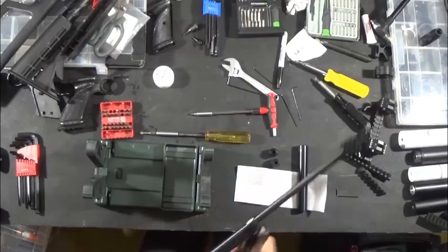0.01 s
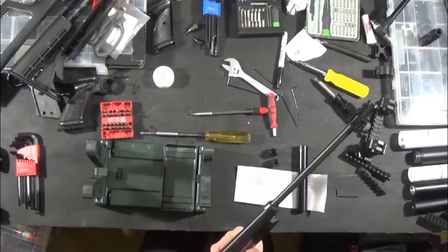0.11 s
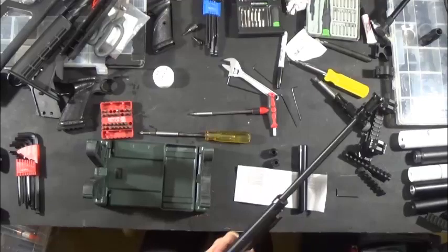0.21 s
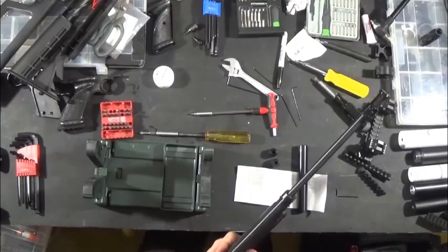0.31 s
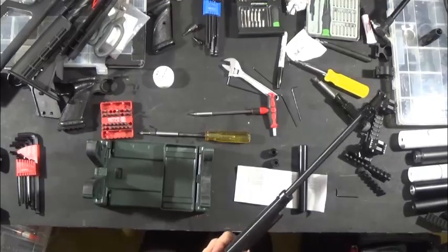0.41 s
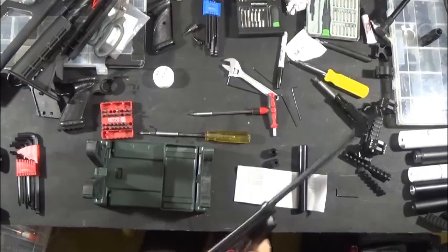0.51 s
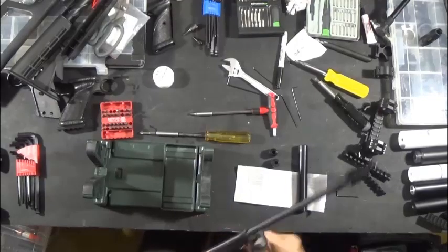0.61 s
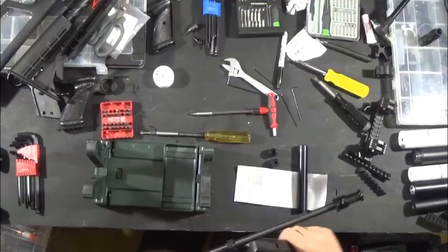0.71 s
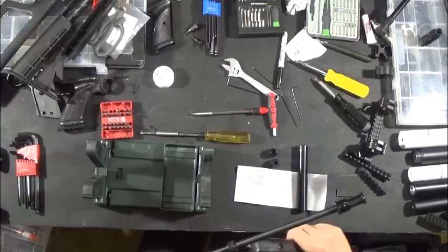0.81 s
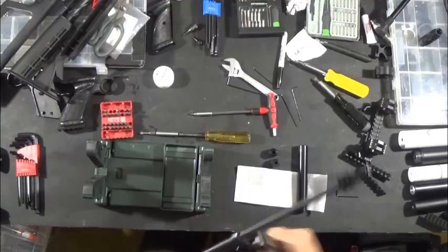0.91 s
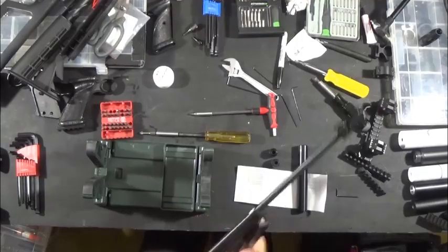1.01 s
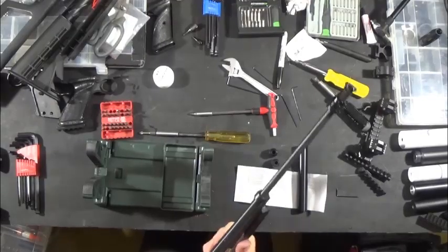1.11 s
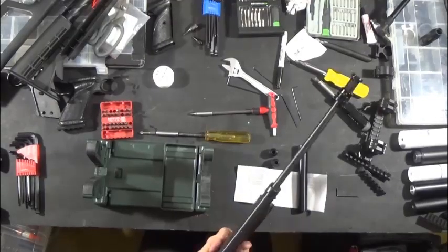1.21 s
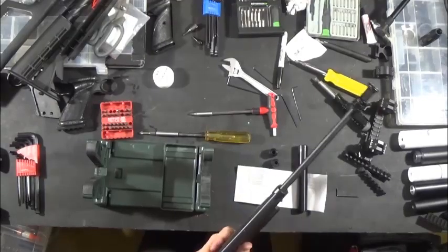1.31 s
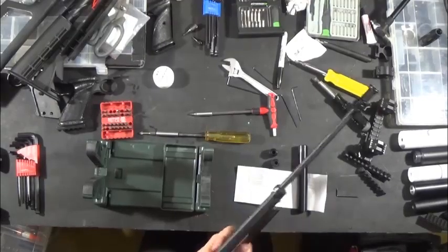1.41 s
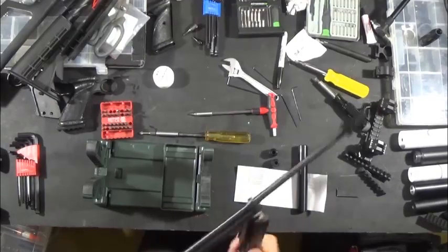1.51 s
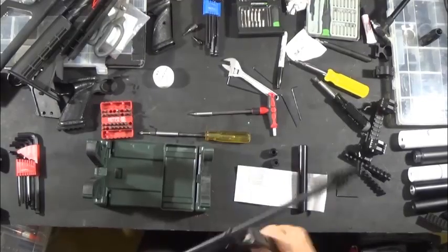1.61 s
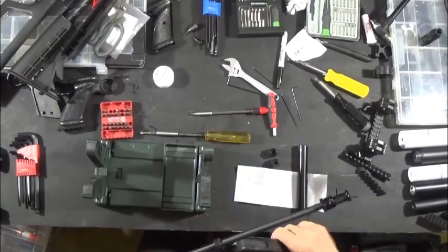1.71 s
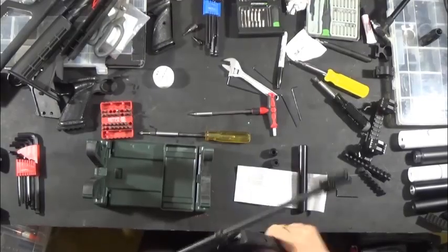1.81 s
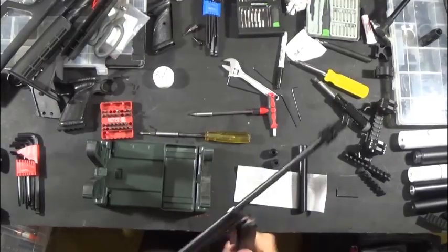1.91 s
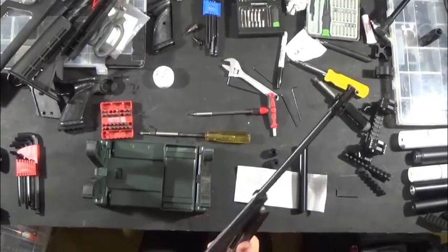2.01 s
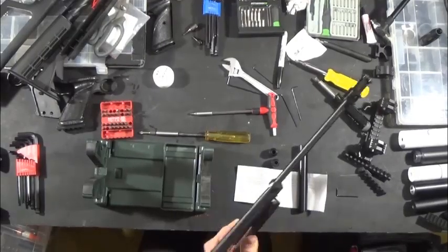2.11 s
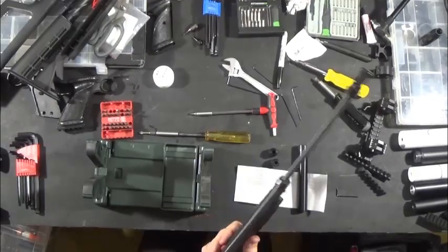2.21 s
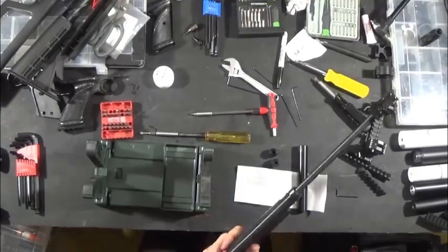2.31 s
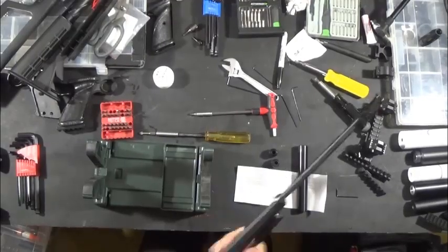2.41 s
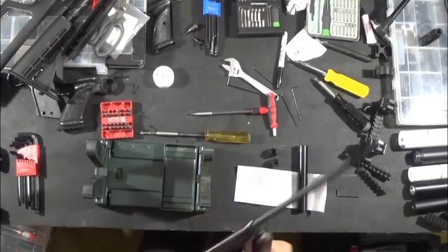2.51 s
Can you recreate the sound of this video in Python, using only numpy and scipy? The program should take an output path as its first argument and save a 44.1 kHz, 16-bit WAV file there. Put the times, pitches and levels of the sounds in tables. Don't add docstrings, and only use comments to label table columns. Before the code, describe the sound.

An air pistol's pump lever is worked three times, each stroke knocking, slamming shut with a sharp clack and puff of air, then clicking open again; close microphones in a small workshop with low room rumble.

```python
import sys
import numpy as np
from scipy import signal
from scipy.fft import rfft, irfft, next_fast_len
from scipy.io import wavfile
from scipy.ndimage import map_coordinates

SR = 44100
rng = np.random.default_rng(int(sys.argv[2]) if len(sys.argv) > 2 else 0)


def gain_from_db(level_db):
    decades = np.asarray(level_db, float) / 20
    return 10 ** decades


def inscribe(sig):
    pcm = np.round(np.clip(np.atleast_2d(sig).T, -1, 1) * 32767)
    wavfile.write(sys.argv[1], SR, pcm.astype(np.int16))


N = 114660


def unit(x):
    return x / np.sqrt(np.mean(np.abs(x) ** 2) + 1e-20)


def wobble(knots_per_s):
    knots = rng.standard_normal(int(N * 2000 / SR) + 4)
    return map_coordinates(knots, [np.arange(N) * knots_per_s / SR])


def filtered(x, response):
    m = next_fast_len(N + SR // 2)
    return irfft(rfft(x, m) * response(np.fft.rfftfreq(m, 1 / SR)), m)[..., :N]


def along(points, hz):
    f, v = np.transpose(points)
    return np.interp(np.log(hz + 1), np.log(f + 1), v)


def rush(spectrum, side_db):
    mid, side = filtered(rng.standard_normal((2, N)), lambda hz: gain_from_db(along(spectrum, hz)))
    side = gain_from_db(side_db) * side
    return unit(np.array([mid + side, mid - side]))


def shape(start_s, attack_s, hold_s, t60_s):
    t = np.arange(N) / SR - start_s
    release_s = np.clip(t - attack_s - abs(hold_s), 0, 9)
    return np.clip(t / attack_s, 0, 1) * gain_from_db(-60 * release_s / t60_s)


# frequency in Hz, level in dB per Hz.
ROOM_NOISE = [(22, -20), (40, -10.5), (70, -7), (125, -7), (170, -15.5), (320, -16.5), (1100, -25),
              (2500, -26)]


def room_rumble():
    rumble_db, murmur_db = -53.5, -62
    low = gain_from_db(rumble_db + 1.22 * wobble(7.05)) * rush(ROOM_NOISE[:5] + [(300, -36)], side_db=-26.0)
    murmur = rush([(100, -55)] + ROOM_NOISE[4:] + [(5000, -36)], side_db=-5.0)
    return low + gain_from_db(murmur_db + 2.7 * wobble(8.14)) * murmur


# time in seconds, hiss level in dB.
PISTON_FLOW = [(0, -58), (.13, -56), (.2, -54), (.46, -58), (.55, -46.5), (.67, -54.5), (.84, -69),
               (.95, -53.5), (1.12, -64), (1.39, -55.5), (1.6, -53), (1.68, -58), (1.82, -61.5),
               (1.95, -54.5), (2.08, -67.5), (2.39, -57.5), (2.6, -53)]
# frequency in Hz, level in dB per Hz.
HISS_SPECTRUM = [(1200, -4), (2200, -7), (3100, -3), (4500, -2), (6500, -2), (8600, 2.5), (11000, -5.5),
                 (16000, -11.5)]


def piston_hiss():
    s, db = np.transpose(PISTON_FLOW)
    level_db = np.interp(np.arange(N) / SR, s, db)
    flutter_db = 1.4 * wobble(22) + .75 * wobble(180)
    return gain_from_db(level_db + flutter_db) * rush(HISS_SPECTRUM, side_db=-13)


def squeal(tables, rough):
    overtone_db, fade_s = -28, .002
    out, t = np.zeros(N), np.arange(N) / SR
    for rows in tables:
        s, hz, db = np.transpose(rows)
        phase = 2 * np.pi * np.cumsum(np.interp(t, s, hz)) / SR
        fade = np.clip(np.minimum(t - s[0], s[-1] - t) / fade_s, 0, 1)
        level = np.sqrt(2) * fade * gain_from_db(np.interp(t, s, db))
        tone = np.sin(phase) + gain_from_db(overtone_db) * np.sin(2 * phase)
        out += level * unit(1 + rough * wobble(400)) * tone
    return out


# time in seconds, pitch in Hz, level in dB.
PIVOT_CREAKS = [
    [(.045, 3100, -70), (.115, 3200, -60), (.16, 3150, -61), (.2, 3150, -67)],
    [(.35, 1300, -66), (.41, 1290, -61), (.47, 1280, -66)],
    [(1.86, 2430, -75), (1.89, 2440, -55), (1.905, 2400, -75)],
    [(0.64, 2800, -69), (0.654, 2820, -54), (0.666, 3060, -66), (0.676, 2740, -51), (0.71, 2980, -72)],
    [(1.622, 2840, -63), (1.63, 2630, -50), (1.642, 2990, -55), (1.66, 2750, -56), (1.68, 3000, -67)],
]


def pivot_creaks():
    return squeal(PIVOT_CREAKS, rough=1.4)


# time in seconds, pitch in Hz, level in dB.
SEAL_SQUEAKS = [
    [(.203, 5750, -50), (.2105, 5450, -15.5), (.2128, 5300, -30), (.215, 5270, -24), (.223, 5320, -23),
     (.231, 5230, -27), (.2345, 5160, -12), (.238, 5100, -19), (.2425, 4900, -21)],
    [(2.122, 6040, -46), (2.135, 5950, -36), (2.14, 5650, -28), (2.1465, 5570, -20), (2.149, 5560, -29),
     (2.155, 5540, -34)],
]


def seal_squeaks():
    return squeal(SEAL_SQUEAKS, rough=.12)


# start in seconds, length in seconds.
SLIDES = [
    (.221, .021),
    (.472, .023),
    (1.138, .065),
    (1.43, .022),
    (1.685, .032),
    (2.104, .05),
    (2.408, .03),
    (1.622, .04),
    (.09, .05),
]
SLIDES_DB = [-39.5, -44, -53, -45, -74, -42.5, -45.5, -61, -57.5]


def scrapes():
    grain_db, t60_s = 3.5, .04
    level = np.zeros(N)
    for (s, length_s), db in zip(SLIDES, SLIDES_DB):
        level += gain_from_db(db) * shape(s, length_s / 2, length_s / 2, t60_s)
    return level * gain_from_db(grain_db * wobble(370)) * gain_from_db([[-3], [0], [4]])


# time
# in seconds, peak in dB, steel in dB.
SMALL_TICKS = [(.1004, -41, -4), (.1219, -35, -5), (.2225, -33, -6), (.2734, -23, 1), (.4914, -33, 3),
               (.8423, -52, 3), (.8613, -46, 3), (.9387, -45, 3), (1.0739, -39, -3), (1.0795, -44, 0),
               (1.1711, -31, 3), (1.2311, -14, 1), (1.247, -15, 1), (1.2575, -17, -1), (1.4011, -39, 1),
               (1.4487, -33, 3), (1.4725, -28, 1), (1.5109, -31, 3), (1.6904, -37, 5), (2.0347, -37, -3),
               (2.1767, -17, 4), (2.1925, -18, -4), (2.2035, -19, -3), (2.4275, -30, -4), (2.4564, -34, 1),
               (2.4759, -26, 3), (2.4924, -33, 5)]


def ticks():
    grip_db, t60_s = -36, .005
    power = np.zeros((3, N))
    for s, db, steel_db in SMALL_TICKS:
        parts = gain_from_db(db - 4.5 + np.array([[grip_db], [0], [steel_db]]))
        power += (parts * shape(s, .0002, .0005, t60_s)) ** 2
    return power


# time in seconds, peak in dB, length of venting in seconds.
SHUTS = [
    (.2778, -6, .018),
    (1.2352, -8.5, .028),
    (2.1797, -7.5, .042),
]
AIR_DB = [-27.5, -29, -28]


def venting():
    rise_share, t60_s, grain_db = .41, .22, 2.5
    rattle_per_s, rattle_db = 250, 9
    air = np.zeros(N)
    for (s, _, hold_s), db in zip(SHUTS, AIR_DB):
        air += gain_from_db(db) * shape(s, rise_share * hold_s, (1 - rise_share) * hold_s + .004, t60_s)
    air = air * gain_from_db([[-6.5], [0], [-1]])
    hits = rng.random((3, N)) < rattle_per_s / SR
    rattle = air * hits * rng.standard_normal((3, N)) * gain_from_db(rattle_db)
    grain = gain_from_db(grain_db * np.array([wobble(140), wobble(250), wobble(330)]))
    return air * grain, rattle


# time in seconds, peak in dB, grip in dB, steel in dB.
LATCH_CLICKS = [(.4953, -10, -22, -4), (.7586, -24, -10, -5), (.8692, -33, -10, -1), (1.1338, -19, -8, 2),
                (1.442, -34, -13, 1), (1.4542, -16, -26, -7), (1.4849, -13, -24, -3), (1.7004, -30, -18, 5),
                (1.7183, -18, -11, -6), (2.1002, -19, -7, 3), (2.4204, -36, -15, 1), (2.4356, -24, -16, -3),
                (2.4620, -23, -12, 1)]
# time in seconds, peak in dB, grip in dB, steel in dB, pitch of struck part in Hz.
TUBE_KNOCKS = [
    (.2419, -15, -3, -5, 810),
    (.2457, -15, -7, -3, 5210),
    (1.2049, -16, -1, -7, 1610),
    (1.2104, -14, -9, -3, 5510),
    (2.1544, -13, -1, -11, 1610),
    (2.1639, -14, -11, -3, 3010),
]


def blows():
    crack_hold_s, crack_t60_s = .0007, .009
    ring_t60_s, ring_db, spike_db = .11, -7.5, 8
    power, spikes = np.zeros((2, 3, N))
    slams = [(s, db - 2.5, -17, 2.3) for s, db, _ in SHUTS]
    for s, db, grip_db, steel_db, *_ in LATCH_CLICKS + TUBE_KNOCKS + slams:
        parts = gain_from_db(db - 10.5 + np.array([grip_db, 0, steel_db]))
        crack = shape(s, .0003, crack_hold_s, crack_t60_s)
        ring = gain_from_db(ring_db) * shape(s, .002, 0, ring_t60_s)
        power += (parts[:, None] * (crack + ring)) ** 2
        spikes[:, round(s * SR) + 4] -= parts * gain_from_db(spike_db)
    return power, spikes


# time in seconds, peak in dB, pitch in Hz, t60 in seconds.
PART_PINGS = [(.4953, -16, 9220, .008), (.4953, -14, 4840, .016), (.4956, -24, 2760, .05),
              (.4969, -21, 2930, .016), (.4998, -24, 7860, .016), (.5005, -38, 900, .12),
              (.513, -27, 3150, .04), (.7588, -27, 2990, .008), (.7592, -38, 8250, .03),
              (.761, -38, 2070, .03), (.8692, -38, 7710, .008), (.8695, -39, 6550, .016),
              (1.1336, -16, 9220, .008), (1.1349, -23, 9450, .008), (1.2053, -27, 390, .04),
              (1.2054, -30, 780, .04), (1.2316, -15, 5040, .008), (1.251, -21, 3120, .03),
              (1.2668, -29, 800, .02), (1.4542, -25, 7840, .04), (1.4542, -19, 4330, .008),
              (1.4551, -29, 2330, .05), (1.4558, -18, 2840, .035), (1.4574, -26, 3920, .03),
              (1.485, -17, 8980, .008), (1.4852, -12, 3660, .008), (1.4856, -21, 5100, .008),
              (1.628, -50, 700, .06), (1.7183, -26, 4520, .008), (1.7183, -20, 3040, .008),
              (1.7186, -24, 8270, .008), (1.7212, -31, 2070, .03), (2.1004, -18, 8550, .016),
              (2.1549, -27, 380, .07), (2.1589, -28, 880, .04), (2.1646, -19, 6000, .008),
              (2.1938, -23, 3810, .05), (2.1998, -20, 3290, .05), (2.2111, -30, 580, .08),
              (2.2157, -22, 3290, .05), (2.4226, -29, 7190, .008), (2.4205, -36, 1930, .04),
              (2.4356, -28, 2300, .05), (2.4356, -28, 8980, .008), (2.4363, -33, 3920, .03),
              (2.4619, -26, 4950, .016), (2.4621, -25, 6180, .008), (2.4624, -37, 1140, .05),
              (2.5401, -42, 1100, .02)]
# delay in seconds, dB relative to the slam peak, pitch in Hz, t60 in seconds.
SHUT_RINGS = [
    (0, -7, 9400, .008),
    (.0002, -10, 3200, .035),
    (0, -10, 3900, .018),
    (.009, -15, 3290, .05),
    (.0005, -17, 1150, .02),
    (.002, -17.5, 390, .03),
    (.0125, -17.5, 475, .035),
    (.0225, -18.5, 620, .055),
]


def pings():
    rise_cycles, side_db = .9, -12
    rows = PART_PINGS + [(s, db - 10, hz, 95 / np.sqrt(hz * 3200)) for s, db, _, _, hz in TUBE_KNOCKS]
    for s, db, _ in SHUTS:
        rows = rows + [(s + later_s, db + under_db, hz, t60) for later_s, under_db, hz, t60 in SHUT_RINGS]
    out, t = np.zeros((2, N + SR)), np.arange(SR // 8) / SR
    for (s, db, hz, t60), lean in zip(rows, rng.uniform(-0.71, 1, len(rows))):
        envelope = gain_from_db(db - .8 - 60 * t / t60) * np.clip(t * hz / rise_cycles, 0, 1)
        tone = envelope * np.sin(2 * np.pi * hz * t)
        pan = 1 + gain_from_db(side_db) * lean * np.array([[1], [-1]])
        out[:, round(s * SR):][:, :len(t)] += tone * pan
    return out[:, :N]


def resonate(x, wide, peaks):
    def ring(f, centre_hz, width_hz, db):
        return gain_from_db(db) * 1j * f * width_hz / (centre_hz ** 2 - f * f + 1j * f * width_hz)

    def response(f):
        modes = sum(ring(f, *peak) for peak in [wide] + list(peaks))
        return unit(ring(f, *wide) * modes)
    return filtered(x, response)


# frequency in Hz, width in Hz, level in dB.
GRIP_MODES = [(388, 26, 0.5), (456, 36, 3), (640, 410, -39), (810, 150, 1), (1020, 110, -5), (1170, 140, 0),
              (1584, 180, 3)]
TUBE_MODES = [(2100, 400, -4), (2900, 150, -1), (3290, 90, 1.5), (3850, 200, 0), (4900, 300, -7),
              (5300, 200, -7)]
STEEL_MODES = [(6300, 600, -5), (7800, 350, -1), (8450, 300, 0), (9100, 400, 1), (10200, 600, -6)]
# frequency in Hz, width in Hz, level in dB.
BODIES = [
    (700, 1300, -4),
    (3300, 3000, -3),
    (8800, 5000, -3),
]
# left-right difference of grip, tube, steel in dB.
BODY_SIDE_DB = [-15.5, -12.5, -18.5]


def lever():
    power, spikes = blows()
    air, rattle = venting()
    power = power + ticks() + air ** 2 + scrapes() ** 2
    mid, side = np.sqrt(power) * rng.standard_normal((2, 3, N))
    mid = mid + spikes + rattle
    side = side * gain_from_db(BODY_SIDE_DB)[:, None]
    grip, tube, steel = (resonate(np.array([m + d, m - d]), wide, modes) for m, d, wide, modes
                         in zip(mid, side, BODIES, (GRIP_MODES, TUBE_MODES, STEEL_MODES)))
    left_db = 1.7
    return grip * gain_from_db([[left_db / 2], [-left_db / 2]]) + tube + steel


# frequency in Hz, t60 in seconds.
ROOM_T60 = [(300, 0.22), (1500, 0.3), (5000, 0.25), (12000, 0.037)]


def room(x):
    delay_s, alike = .0052, .52
    out, block = np.zeros((2, N + SR)), SR // 2
    turn = np.arccos(alike) / 2
    for a in range(0, N, block):
        hz, t, z = signal.stft(rng.standard_normal((2, block)), SR, nperseg=256)
        decay = gain_from_db(-60 * t / along(ROOM_T60, hz)[:, None])
        mid, side = signal.istft(z * decay, SR, nperseg=256)[1][:, :block]
        mid_part, side_part = np.cos(turn) * mid, np.sin(turn) * side
        tail = np.array([mid_part + side_part, mid_part - side_part]) / np.linalg.norm(mid)
        wet = signal.fftconvolve(x[None, a:a + block], tail, axes=1)
        out[:, a + round(delay_s * SR):][:, :wet.shape[1]] += wet
    return out[:, :N]


def scene():
    pistol = lever() + pings() + seal_squeaks() + pivot_creaks()
    return pistol + gain_from_db(-12) * room(pistol.mean(axis=0)) + piston_hiss() + room_rumble()


def band_limit(x):
    return signal.sosfilt(signal.butter(12, 16470, fs=SR, output="sos"), x)


# frequency in Hz, gain in dB.
MICROPHONE_GAIN = [(150, 0), (10000, 0), (12500, -4), (14500, -9), (16300, -18), (16550, -70)]


def record(dry):
    mix = filtered(dry, lambda hz: gain_from_db(along(MICROPHONE_GAIN, hz)))
    return band_limit(mix)


dry = scene()
out = record(dry)
inscribe(out)
```